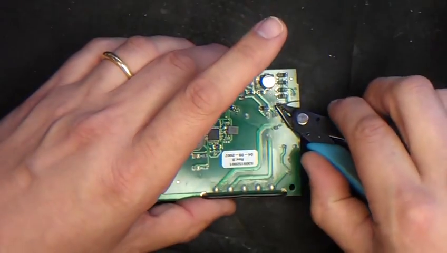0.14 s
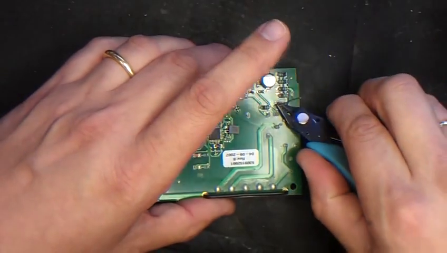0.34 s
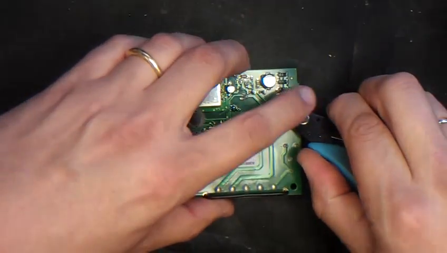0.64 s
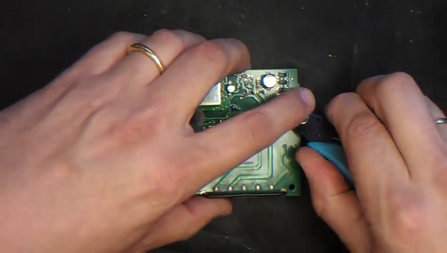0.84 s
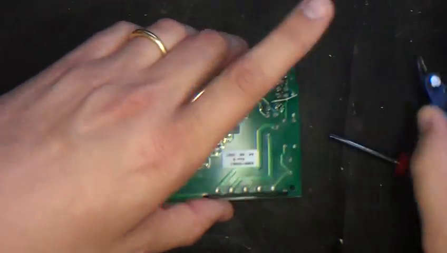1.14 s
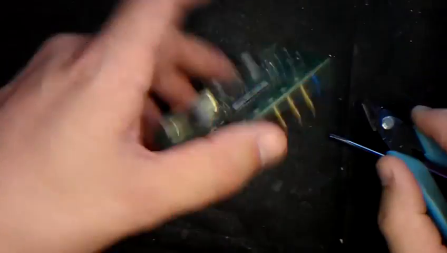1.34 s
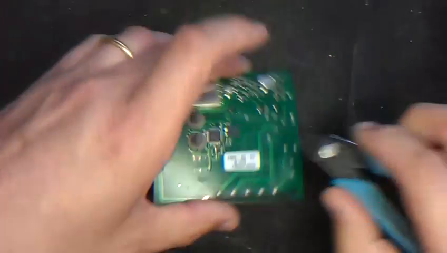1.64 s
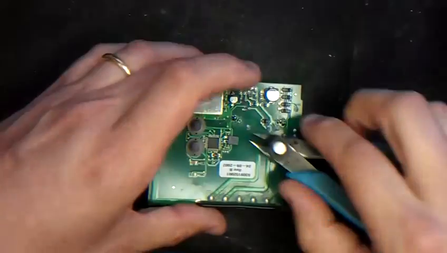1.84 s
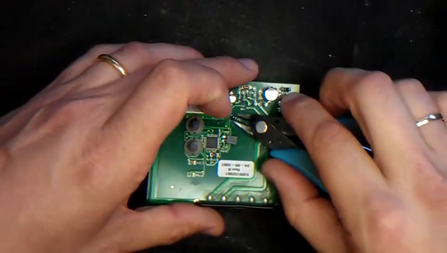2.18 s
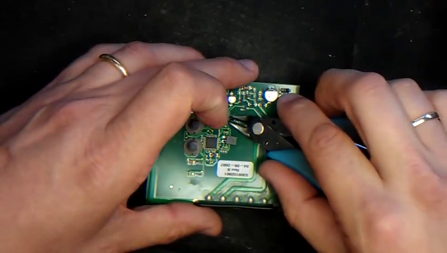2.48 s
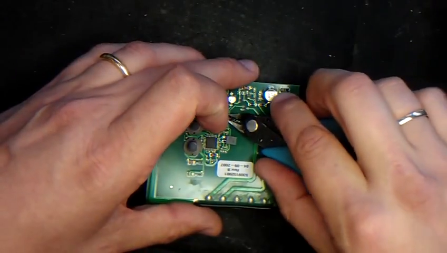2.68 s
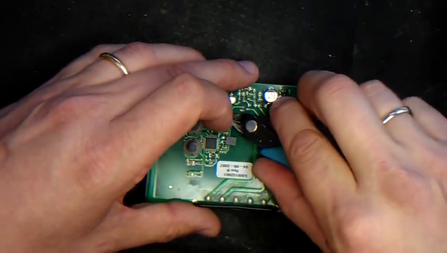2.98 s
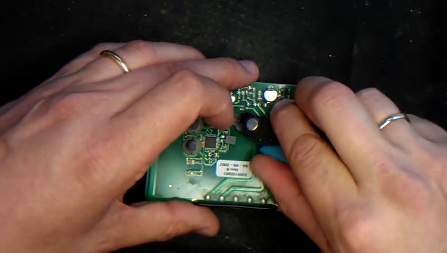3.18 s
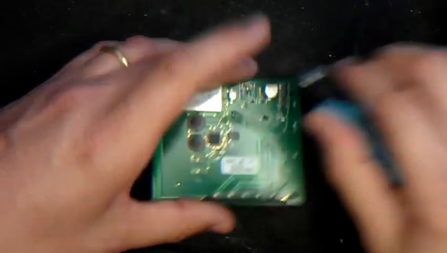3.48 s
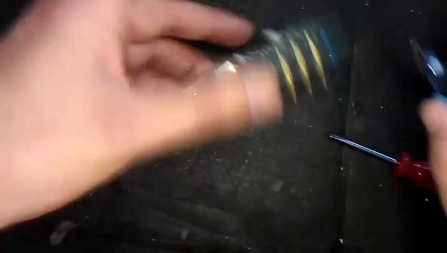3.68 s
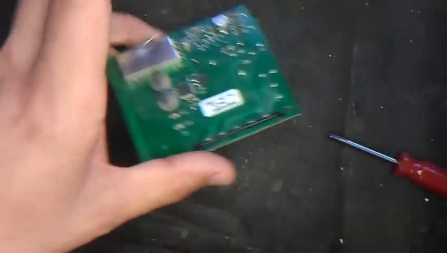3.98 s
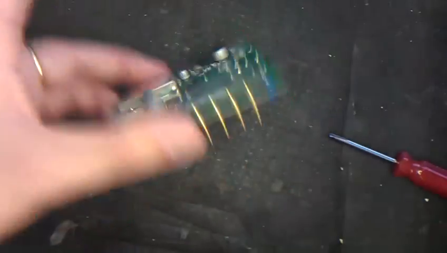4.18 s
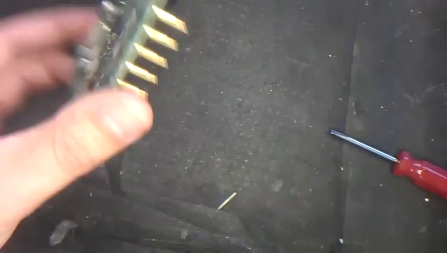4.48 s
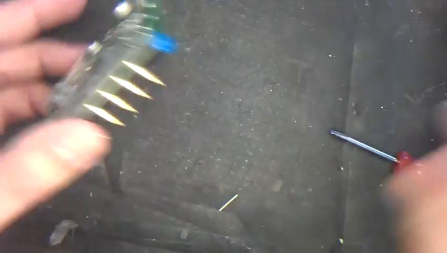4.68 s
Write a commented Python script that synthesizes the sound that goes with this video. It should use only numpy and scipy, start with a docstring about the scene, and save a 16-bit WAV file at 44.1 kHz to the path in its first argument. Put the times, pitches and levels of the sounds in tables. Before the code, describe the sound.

A small, dry room with a very faint steady mains hum and fan-like hiss, heard close by one microphone with a little stereo width. The tail of an earlier sound dies away at the start, then near silence with a tiny tick. At about 0.9 s flush cutters snip a lead: a loud, sharp crack and jaw clack milliseconds apart, briefly ringing the board. Small clicks follow at 1.0 s, then soft finger rustles and light ticks from 1.2 to 1.8 s, a fainter rub near 2.2 s and sparse ticks. At 3.26 s a second snip, brighter and slightly softer, trails rustle and tiny clicks. Quiet handling and faint ticks continue until 4.1 s. At 4.3 s a quick rub and metallic scraping begin as a screwdriver is dragged; it bumps, knocks hollowly on the bench at 4.6 s with fast bounces, then rolls in an even, rapid rattle, fading to the end.

```python
"""Mains hum and a fan-like hiss, sine partials and shaped noise, lie below a bench in a small room.
An earlier sound dies away, then fingers rustle on a hand-held circuit board as noise of micro-slips.
Offcuts and tools tick as mode clusters; flush cutters snip a lead near 0.9 s and another near 3.3 s:
dying noise, ringing board modes and a clack of the jaws. From 4.3 s a screwdriver is dragged (slips through
shaft resonances), knocked on the bench and rolled. One microphone; delayed copies make the side signal."""
import sys
import numpy as np
from scipy import signal
from scipy.fft import rfft, irfft, next_fast_len
from scipy.io import wavfile
from scipy.ndimage import map_coordinates

SR = 44100
rng = np.random.default_rng(int(sys.argv[2]) if len(sys.argv) > 2 else 0)


def output_pcm(signal):
    """Save a mono or channel-first signal as 16-bit PCM at the path in sys.argv[1].

    Samples are clipped to [-1, 1] before scaling.
    """
    pcm = np.clip(np.atleast_2d(signal).T, -1, 1) * 32767
    wavfile.write(sys.argv[1], SR, np.round(pcm).astype(np.int16))


N = 212650
TIME = np.arange(N) / SR

# spectrum of the noise of a shearing crack or a tick's snap: f/Hz, relative level per Hz/dB
SNIP_COLOUR = [(88, -47), (150, -17.5), (270, -10), (434, -15), (893, -4.5), (1040, -9), (1210, -11.5),
               (1440, -6), (3070, -6), (3640, -0.5), (5220, -8), (9760, -11), (13200, -22.5), (14000, -46)]
# spectrum of rubbing skin, also of the hiss of the drag: f/Hz, relative level per Hz/dB
RUSTLE_COLOUR = [(260, -43), (450, -17), (654, 4.5), (1380, -8.5), (1570, -3), (3000, -8), (10800, -19),
                 (14000, -44)]


def from_db(db):
    """Amplitude ratio of a level: 20 dB is a factor of ten."""
    return 10 ** (np.asarray(db) / 20)


def rms_one(x):
    """Normalisation of the mean power: scaled to rms 1."""
    return x / np.sqrt(np.mean(x ** 2) + 1e-20)


def coloured(x, spectrum, tilt_db=0):
    """Spectral shaping: weights the spectrum, tilted in dB per octave about 3 kHz; rms 1."""
    hz = np.maximum(np.fft.rfftfreq(len(x), 1 / SR), 10)
    table = np.array(spectrum)
    level_db = np.interp(np.log(hz), np.log(table[:, 0]), table[:, 1])
    level_db = level_db + tilt_db * np.log2(hz / 3000)
    return rms_one(irfft(rfft(x) * from_db(level_db), len(x)))


def drift(rate):
    """Slow random modulation: a spline through normal knots of spread 1, rate of them a second."""
    knots = rng.standard_normal(int(N / SR * rate) + 3)
    return map_coordinates(knots, [TIME * rate], order=2)


def stroke(rows):
    """Exponential growth and decay: the level rises, holds and falls in straight lines of dB."""
    level_db = []
    for s, full_db, rise, hold, fall in rows:
        before = np.maximum(s - TIME, 0) / rise
        after = np.maximum(TIME - s - abs(hold), 0) / fall
        level_db.append(full_db - 20 * (before + after))
    return from_db(np.max(level_db, axis=0))


def dying(age, t60):
    """Envelope of a damped blow: quick rise, exponential fall."""
    attack_s = 0.002
    return (1 - np.exp(-age / attack_s)) * from_db(-60 * age / t60)


def resonance(x, hz, width_hz):
    """Damped resonator: two poles, gain 1 on top."""
    r = np.exp(-np.pi * width_hz / SR)
    feedback = [1, -2 * r * np.cos(2 * np.pi * hz / SR), r * r]
    return signal.lfilter(np.array([1, 0, -1]) * (1 - r * r) / 2, feedback, x)


def ring(clicks, hz, t60):
    """Impulse response of a mode: a unit click starts a decaying sine of height 1."""
    r, w = from_db(-60 / (t60 * SR)), 2 * np.pi * hz / SR
    return signal.lfilter([0, np.sin(w)], [1, -2 * r * np.cos(w), r * r], clicks + 1e-18)


def add(out, s, burst):
    """Superposition: adds a short sound to the track at time s."""
    at = round(s * SR)
    out[at:at + len(burst)] += burst[:N - at]


def struck(blows, modes):
    """Modal excitation: each blow strikes every mode with a strength and sign of its own."""
    s, peak_db = np.array(blows)[:, :2].T
    chance, out = rng.standard_normal((len(s), len(modes), 2)), np.zeros(N)
    for k, (hz, level_db, t60) in enumerate(modes):
        clicks = np.zeros(N)
        strengths = from_db(peak_db + level_db + 1.3 * chance[:, k, 0])
        clicks[(s * SR).astype(int)] = strengths * np.sign(chance[:, k, 1])
        out += ring(clicks, hz, t60)
    return out


def grains():
    """Stick-slip friction: dense, uneven micro-slips of a rubbing contact."""
    grains_per_s, spread_db = 1800, 2
    sizes = from_db(spread_db * np.minimum(rng.exponential(1, N), 5)) * rng.choice([-1, 1], N)
    return sizes * (rng.random(N) < grains_per_s / SR)


def hum(loud):
    """Additive synthesis: wavering mains partials, lifted by a smoothed envelope of the other sounds."""
    # mains partials before the swell: f/Hz, rms level/dB, waver/dB
    partial_rows = [(199.6, -73, 3), (249, -74.5, 0.5), (299.8, -53.5, 0.24), (388, -79, 3),
                    (638.6, -75.5, -0.5)]
    swell_db, swell_at_start = 10.5, 0.87  # first: added gain at an envelope of 0.022
    rise_s, fall_s = 0.0045, 0.038
    rise, fall = np.exp(-1 / (rise_s * SR)), np.exp(-1 / (fall_s * SR))
    envelope = signal.lfilter([1 - rise], [1, -rise], np.abs(loud))
    envelope = signal.lfilter([1 - fall], [1, -fall], envelope)
    swell = 1 + from_db(swell_db) * envelope / 0.022 + swell_at_start * np.exp(-TIME / 0.043)
    partials = 0
    for hz, level_db, waver_db in partial_rows:
        gain = from_db(level_db + waver_db * drift(14))
        partials = partials + gain * np.sin(2 * np.pi * (hz * TIME + rng.random()))
    return swell * np.sqrt(2) * partials


def hiss():
    """Filtered noise: a broad spectrum with slight level drift, and thin resonant bands."""
    # spectrum of the broad hiss: f/Hz, relative level per Hz/dB
    broad_colour = [(20, -45), (60, -18.5), (110, -5.5), (200, 6.5), (400, 2), (640, 1), (900, -0.5),
                    (1800, -5.5), (4400, -7), (7000, -15), (10300, -15.5), (12200, -27), (12700, -38),
                    (14000, -48)]
    # thin bands in the hiss: f/Hz, width/Hz, rms level/dB
    whines = [(4490, 220, -81), (5910, 150, -81.5), (8680, 330, -80.5)]
    level = from_db(-65.5 + 0.74 * drift(6.04))
    broad = level * coloured(rng.standard_normal(N), broad_colour)
    white = rng.standard_normal(N)
    thin = sum(from_db(level_db) * rms_one(resonance(white, hz, width_hz)) for hz, width_hz, level_db in whines)
    return broad + thin


def rustle():
    """Friction noise: fingers slip on the board, one swell a stroke; the first is an earlier sound dying away."""
    # strokes: full from t/s, level/dB, rise over 20 dB/s, hold/s, fall over 20 dB/s
    strokes = [(0, -54, .01, 0, 0.1), (.18, -67, 0.25, 0, 0.2), (1.15, -66, 0.096, 0, .35),
               (1.33, -61, .12, 0, 0.14), (1.55, -67, 0.046, .17, 0.63), (2.24, -62, 0.037, 0, 0.23),
               (2.68, -68, 0.16, 0, 0.27), (3.35, -58.5, 0.057, 0.0043, 0.27),
               (3.8, -65.5, 0.37, 0.0057, .1), (4.1, -67.5, 0.55, 0, 0.36), (4.3, -54, .02, 0.061, 0.056)]
    return stroke(strokes) * coloured(grains(), RUSTLE_COLOUR)


def drag():
    """Friction-driven resonance: slips excite the screwdriver's shaft; bumps and rolling press harder."""
    # two drags: full from t/s, level/dB, rise over 20 dB/s, hold/s, fall over 20 dB/s
    strokes = [(4.29, -61.5, 0.018, 0.086, 0.13), (4.52, -55, 0.14, 0.13, 0.41)]
    # resonances of the shaft: f/Hz, width/Hz, level/dB
    shaft_modes = [(1048, 30, -2), (1628, 75, 0), (2660, 110, -5.5), (2970, 43, 3.5), (3640, 260, -6),
                   (4040, 110, -6.5), (4550, 110, -7.5), (5700, 110, -11)]
    # the grip bumps on the bench: t/s, level re the drag before the bump's envelope/dB
    bumps = [(4.291, 6), (4.307, 14.5), (4.362, 12), (4.457, 6), (4.483, 8.5), (4.59, 2), (4.598, 2),
             (4.618, 11.5)]
    bump_t60_s, hiss_db = 0.054, -2
    # then it rolls from flat to flat at an even pace
    roll_from_s, roll_step_s, roll_db = 4.69, 0.037, 5
    rolls = [(s, roll_db) for s in np.arange(roll_from_s, N / SR, roll_step_s)]
    pressure = np.ones(N)
    for s, level_db in bumps + rolls:
        add(pressure, s, from_db(level_db) * dying(TIME[:4096], bump_t60_s))
    slips = grains()
    shaft = sum(from_db(level_db) * resonance(slips, hz, width_hz) for hz, width_hz, level_db in shaft_modes)
    contact_hiss = from_db(hiss_db) * coloured(slips, RUSTLE_COLOUR, tilt_db=1.5)
    return stroke(strokes) * pressure * (rms_one(shaft) + contact_hiss)


def knocks():
    """Forced vibration: a snap and a loose rattle at each contact shake the bench top's resonances."""
    # the screwdriver's grip thuds on the bench and bounces: t/s, nominal level/dB
    contacts = [(4.591, -28), (4.598, -30.5), (4.614, -34.5), (4.624, -36.5), (4.639, -52)]
    # resonances of the bench top: f/Hz, width/Hz, level/dB
    bench_modes = [(237, 89, -1.5), (350, 61, 1.5), (435, 48, -0.5), (598, 76, -9.5), (773, 81, -8),
                   (966, 55, -5), (1210, 120, -16.5)]
    snap_db, rattle_db, rattle_t60_s = 35, 16, 0.093  # dB re the contact's level
    force = np.zeros(N)
    for s, peak_db in contacts:
        rattle = dying(TIME[:6000], rattle_t60_s) * rng.standard_normal(6000)
        add(force, s, from_db(peak_db + rattle_db) * rattle)
        add(force, s, from_db([peak_db + snap_db]))  # a single sample
    return sum((-1) ** k * from_db(level_db) * resonance(force, hz, width_hz)
               for k, (hz, width_hz, level_db) in enumerate(bench_modes))


def ticks():
    """Modal cluster: modes start in step as a sharp click with a weak ring, over a broad puff of noise."""
    # ticks of offcuts, tool and board, and the clack of the cutter's jaws meeting in each snip:
    # t/s, nominal level/dB, centre f/Hz, half-spread of ln f, broad snap re the tick/dB
    tick_rows = [(.159, -56.5, 3940, .1, 1), (0.8756, -12, 1750, 0.26, -19),
                 (1.002, -35.5, 3970, 0.16, -3.5), (1.032, -47.5, 4080, .06, 5),
                 (1.383, -49, 1385, 0.29, -14), (1.5318, -48, 4450, 0.1, -15),
                 (1.5363, -30, 4740, 0.21, -9), (1.541, -38, 3640, 0.12, -2),
                 (1.5901, -39.5, 4520, 0.35, -16), (1.615, -52, 4250, .15, -12),
                 (1.625, -47, 4350, 0.23, -16), (1.788, -46.5, 1436, 0.45, -8),
                 (2.219, -44, 1370, 0.62, -21), (2.234, -47, 2000, 0.089, -23),
                 (2.25, -48, 1124, 0.33, -17), (2.616, -56, 2040, 0.11, -6),
                 (2.698, -48.5, 1530, 0.47, -23), (2.99, -55, 1840, 0.26, -10),
                 (3.241, -43.5, 2220, 0.26, -31), (3.263, -15.5, 3856, 0.032, -27),
                 (3.272, -17.5, 3490, .17, 2.5), (3.313, -32.5, 1995, 0.11, -20),
                 (3.3205, -33, 1680, 0.37, -16), (3.358, -49, 2100, 0.056, -5),
                 (3.370, -45.5, 2140, 0.035, -9), (3.392, -46, 3840, 0.067, -7),
                 (3.416, -48.5, 3620, .16, 3), (3.461, -53, 3510, .09, 5.5),
                 (3.483, -60.5, 1990, 0.076, 5.5), (3.651, -48, 836, 0.52, -10.5),
                 (3.825, -59, 9200, .2, 7), (3.837, -49.5, 3830, 0.061, -14),
                 (3.959, -47, 9400, 0.084, -10), (4.023, -53, 3860, 0.055, -4),
                 (4.029, -58, 7280, .03, -20), (4.086, -52.5, 3840, .04, 2.5)]
    # base t60 at -50 dB and a spread of .1; harder blows (dB of length per dB of level)
    # and broader, deader ones (power of the spread) die sooner
    base_t60_s, shortens, broad_shortens = 0.067, 0.26, 0.29
    snap_share = 0.52  # t60 of the snap as a share of the tick's t60
    out, age, place = np.zeros(N), TIME[:4096], np.linspace(-1, 1, num=15)[:, None]
    for s, peak_db, hz, spread, snap_db in tick_rows:
        t60 = base_t60_s * from_db(-shortens * (peak_db + 50)) * (.1 / spread) ** broad_shortens
        noise, chance = rng.standard_normal(len(age)), rng.random((3, 15, 1))
        pitches = hz * np.exp(spread * (place + 0.33 * (chance[0] - .5)))
        strengths = np.exp(-1.5 * place ** 2) * (.5 + chance[1])
        lives = t60 * (1.35 + chance[2])  # each mode outlasts the tick's t60
        modes = strengths * from_db(-60 * age / lives) * np.sin(2 * np.pi * pitches * age)
        tone = modes.sum(axis=0) / 7.16
        puff = coloured(noise, SNIP_COLOUR, tilt_db=1.5)
        snap = from_db(snap_db) * dying(age, snap_share * t60) * puff
        add(out, s, from_db(peak_db) * (tone + snap))
    return out


def snips():
    """Impulsive excitation: a shock rattles jaws, board and hand as dying noise, and rings the board."""
    # each snip is a shearing crack, then the jaws meeting: t/s, nominal peak level/dB, tilt/(dB/octave), t60/s
    shocks = [(0.868, -10, 3.5, .11), (0.8752, -10.5, -3.5, 0.058), (3.2551, -12, 3, 0.11),
              (3.263, -14.5, 4, 0.077)]
    # modes of board and cutters: f/Hz, relative level/dB, t60/s
    board_modes = [(398, -13.5, 0.033), (757, -11, 0.22), (965, -10.5, 0.068), (1360, -11, .06),
                   (1660, -16, 0.065), (2090, -1.5, 0.092), (3560, -3, 0.11), (3870, -5.5, 0.078),
                   (3640, 6.5, 0.044), (4080, -7, 0.092), (4550, -20.5, .08)]
    board_db = -22
    out, age = np.zeros(N), TIME[:8192]
    for s, peak_db, tilt_db, t60 in shocks:
        noise = coloured(rng.standard_normal(len(age)), SNIP_COLOUR, tilt_db)
        # the noise has rms 1 before its envelope, so it starts from 8 dB below the nominal peak
        add(out, s, from_db(peak_db - 8.0) * dying(age, t60) * noise)
    return out + from_db(board_db) * struck(shocks, board_modes)


def room(x):
    """Reverberation by recirculation: eighteen feedback delays, duller on every round."""
    low_t60_s, wall_cut_hz = 0.21, 14000  # the treble dies sooner
    size = next_fast_len(N + SR)
    hz = np.fft.rfftfreq(size, 1 / SR)
    wall = 1 / (1 + 1j * hz / wall_cut_hz)
    echoes = 0
    for k, lag in enumerate(np.geomspace(.006, .037, num=18)):  # lags in s
        loop = from_db(-60 * lag / low_t60_s) * wall * np.exp(-2j * np.pi * hz * lag)
        echoes = echoes + (-1) ** k * loop / (1 - loop)
    return irfft(rfft(x, size) * echoes, size)[:N]


def scene():
    """Superposition: direct sound, room, hum and hiss reach one microphone."""
    bass_cut_hz, room_db = 193, -21.5
    near = rustle() + drag() + knocks() + ticks() + snips()
    # bass cut of the near sounds: thin, with little below 190 Hz
    near = signal.sosfilt(signal.butter(4, bass_cut_hz, "high", fs=SR, output="sos"), near)
    heard = near + from_db(room_db) * room(near)
    return np.tile(heard + hum(heard) + hiss(), (2, 1))


def record(dry):
    """Mid-side widening: side = inverted short delay plus treble-only long delay; then the top is cut."""
    near_s, far_s = 71.5 / 44100, 178 / 44100
    near_db, near_shelf_db, near_treble_db, far_db = -.2, -2, -2, -5
    shelf_hz, treble_hz = 1100, 4700
    size = next_fast_len(N + 1024)
    hz = np.fft.rfftfreq(size, 1 / SR)
    treble = hz ** 4 / (hz ** 4 + treble_hz ** 4)
    shelf = hz ** 2 / (hz ** 2 + shelf_hz ** 2)
    near_gain = from_db(near_db + near_shelf_db * shelf + near_treble_db * treble)
    near = -near_gain * np.exp(-2j * np.pi * hz * near_s)
    far = from_db(far_db) * treble * np.exp(-2j * np.pi * hz * far_s)
    side = irfft(rfft(dry[0], size) * (near + far), size)[:N]
    wide = np.array([dry[0] + side, dry[0] - side])
    # 70 dB down from 14300 Hz up
    return signal.sosfilt(signal.cheby2(12, 70, 14300, fs=SR, output="sos"), wide)


dry = scene()
out = record(dry)
output_pcm(out)
```